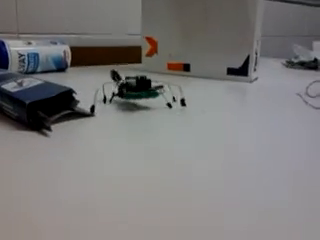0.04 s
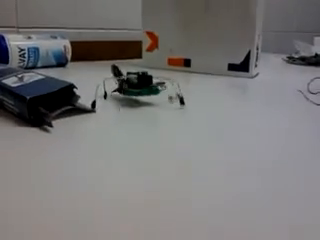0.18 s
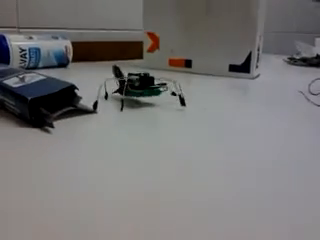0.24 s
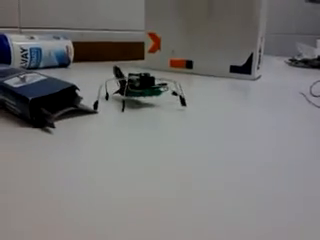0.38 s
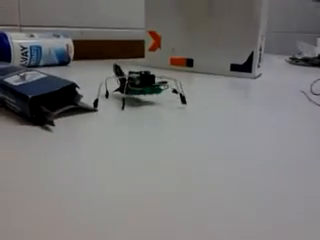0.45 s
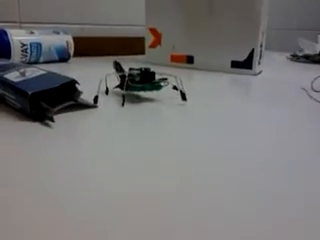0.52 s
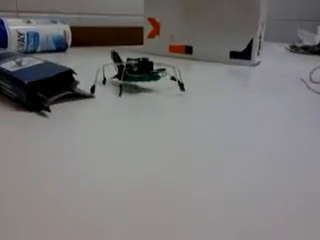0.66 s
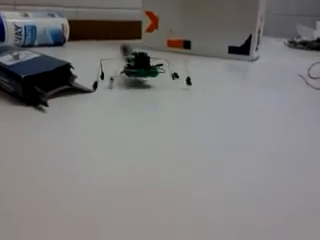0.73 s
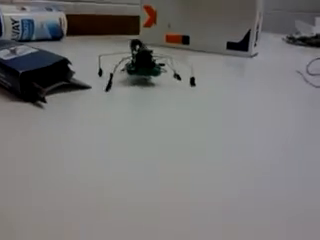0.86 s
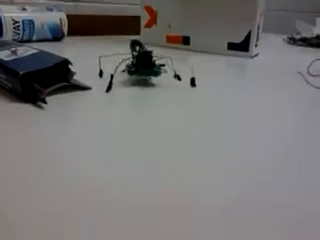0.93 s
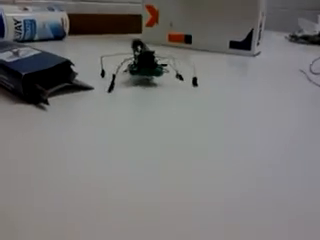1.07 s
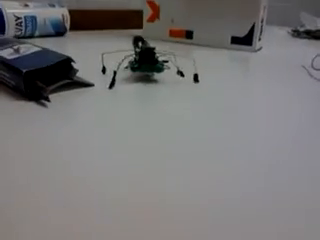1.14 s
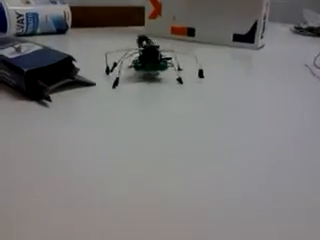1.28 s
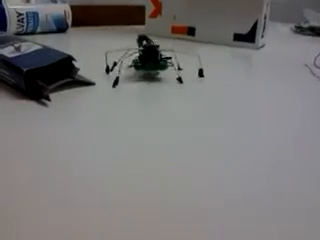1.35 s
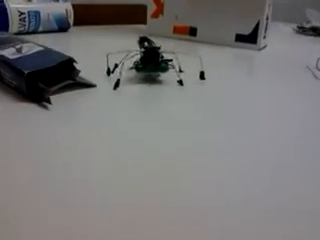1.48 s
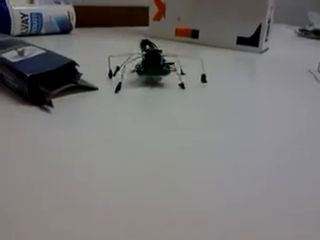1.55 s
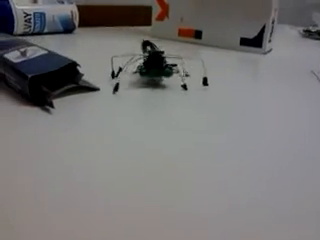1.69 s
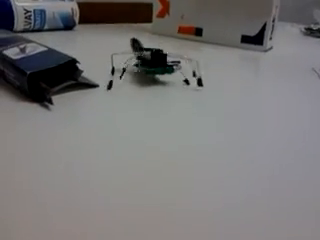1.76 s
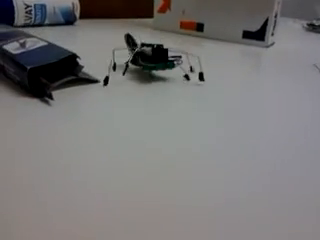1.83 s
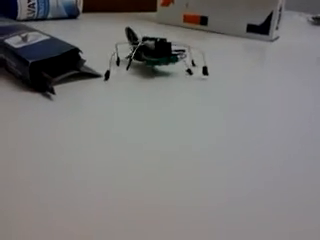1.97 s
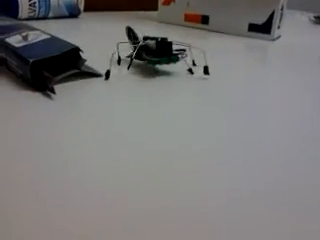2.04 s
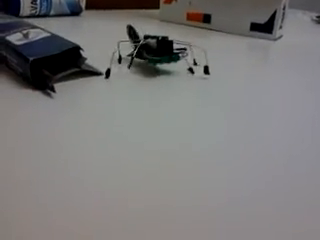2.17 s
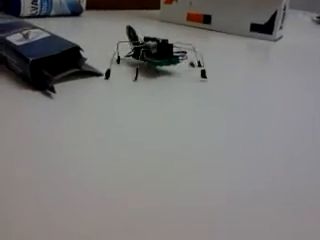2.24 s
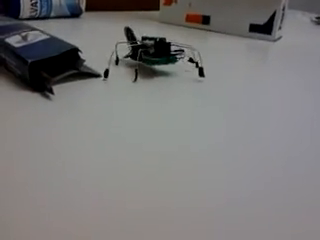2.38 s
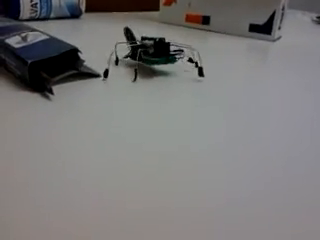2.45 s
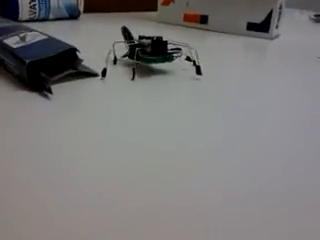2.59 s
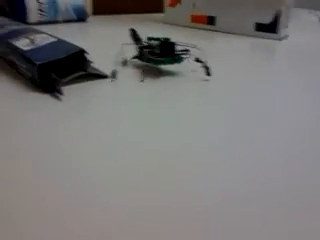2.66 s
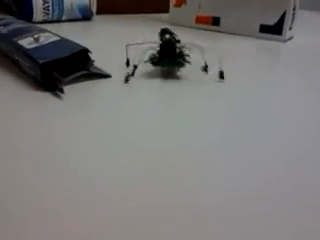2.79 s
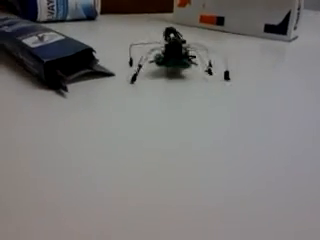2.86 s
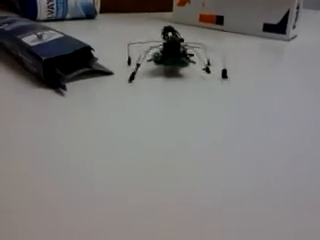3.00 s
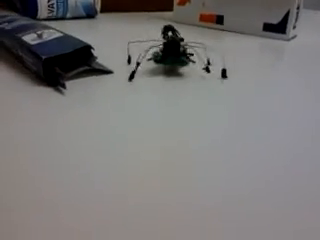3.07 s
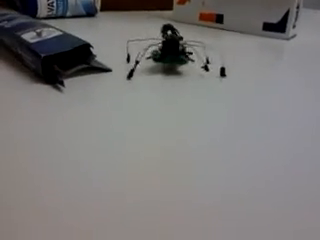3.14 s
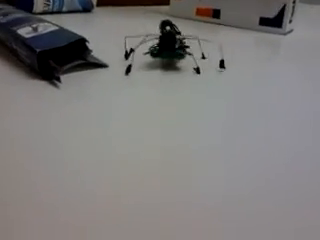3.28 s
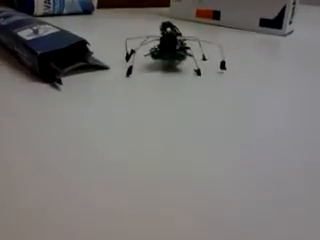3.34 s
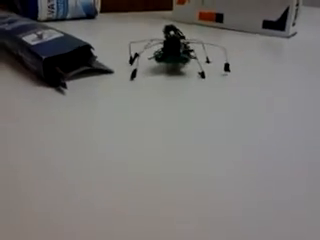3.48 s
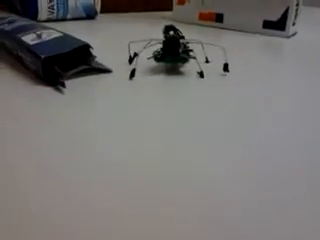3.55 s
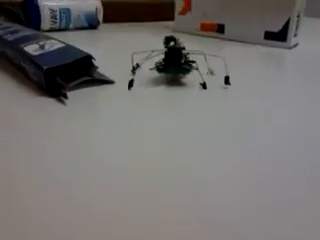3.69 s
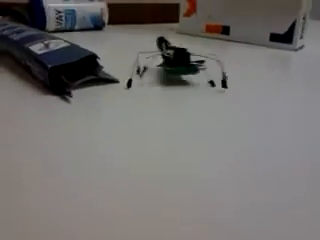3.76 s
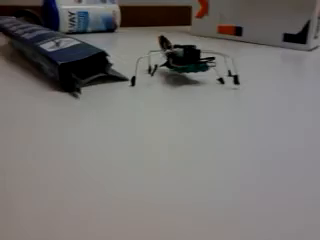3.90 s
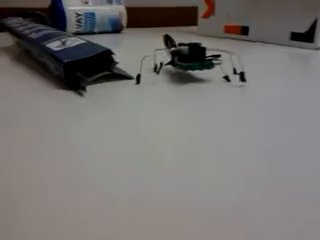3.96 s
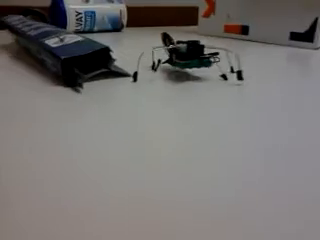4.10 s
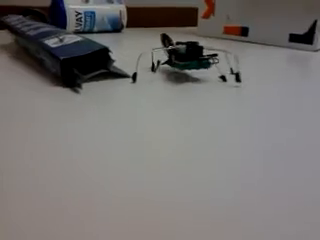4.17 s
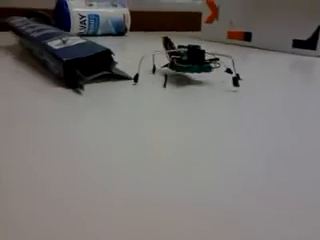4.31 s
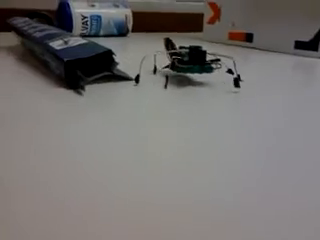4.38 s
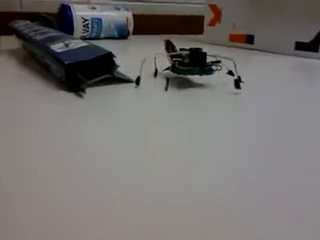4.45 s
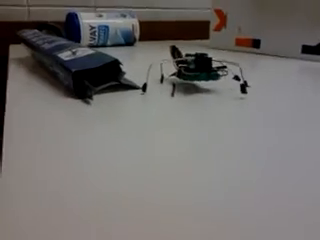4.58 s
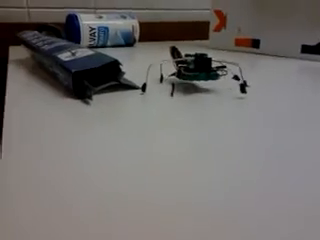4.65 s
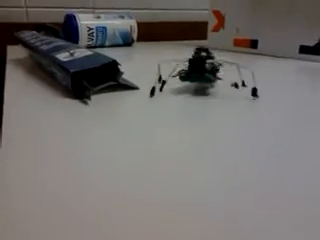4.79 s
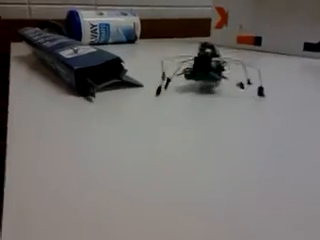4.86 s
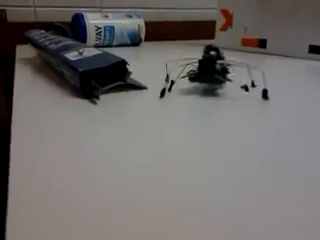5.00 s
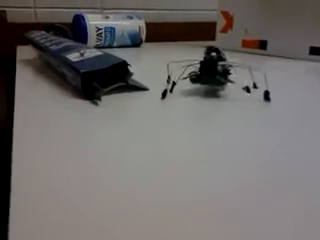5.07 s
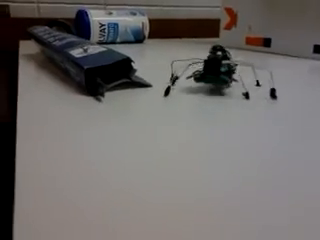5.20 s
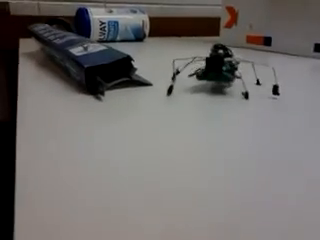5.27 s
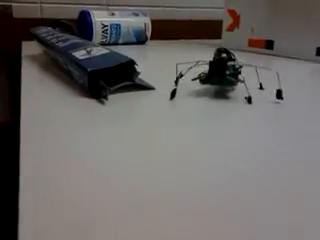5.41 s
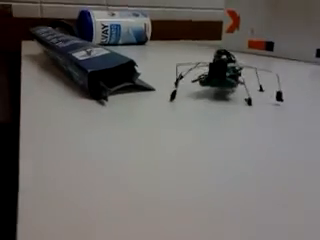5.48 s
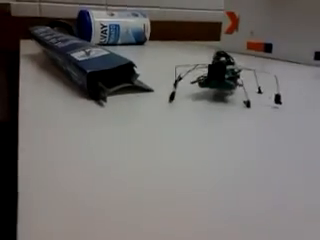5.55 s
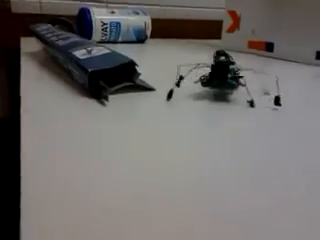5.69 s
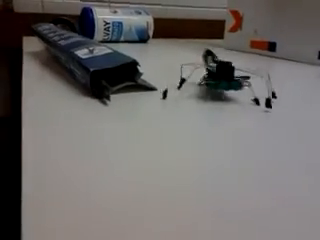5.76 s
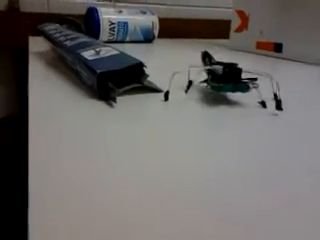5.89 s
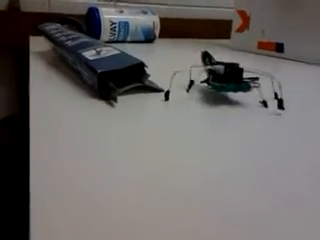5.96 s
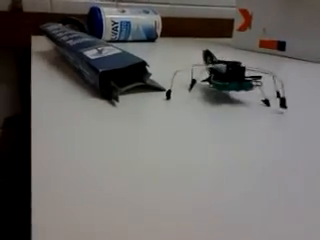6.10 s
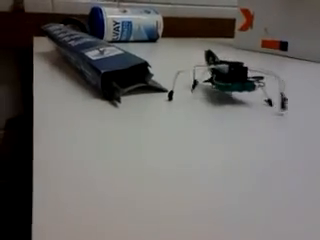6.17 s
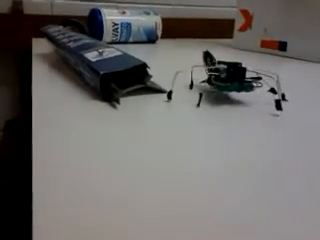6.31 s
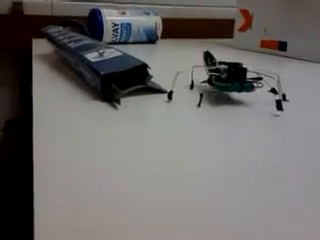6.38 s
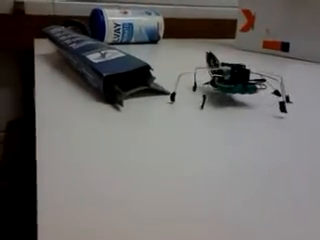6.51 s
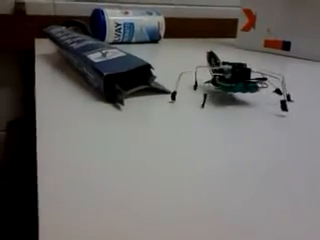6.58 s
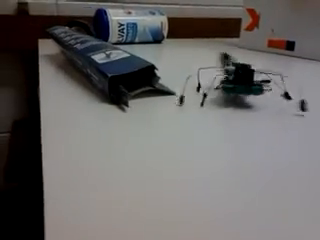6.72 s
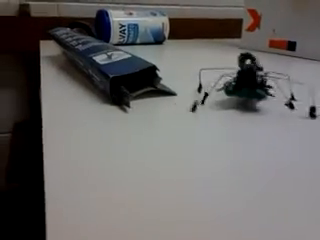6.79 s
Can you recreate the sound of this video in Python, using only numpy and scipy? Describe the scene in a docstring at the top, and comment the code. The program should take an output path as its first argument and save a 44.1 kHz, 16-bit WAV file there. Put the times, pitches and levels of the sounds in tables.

```python
"""A small wire-legged robot walks on a table in a quiet room. Its servos whirr on every beat, twice a second:
gear teeth tick and rub, a motor whines, and the motors fizz and grind while they hold each pose.
Feet land in pairs as short clusters of damped rings with a skid of noise; wire legs tick, a joint squeaks once.
Three dry clicks, each a snap, a knock and a rattle, sound right at the microphone.
A faint mains hum of wavering tones and a soft rush of noise lie under it all."""
import sys
import numpy as np
from scipy import signal
from scipy.fft import rfft, irfft
from scipy.io import wavfile
from scipy.ndimage import map_coordinates

SR = 44100
rng = np.random.default_rng(int(sys.argv[2]) if len(sys.argv) > 2 else 0)


def pcm_store(signal):
    """Save signal as 16-bit PCM."""
    levels = np.round(np.clip(np.atleast_2d(signal), -1, 1) * 32767)
    wavfile.write(sys.argv[1], SR, levels.astype(np.int16).T)


N = 301644

# the time of every sample (s); the walk is under way a moment before zero
TIME = np.arange(-SR // 4, N) / SR
# one servo stroke on every beat (s), and the control pulses that drive the servos (per second)
FIRST_STROKE_S, BEAT_S, PULSE_HZ = -.153, .5004, 49.7
# the four strokes of a stride (legs back, body over, legs forward, body back): [length_s, level_db,
# swell_db from start to end, gear_case_db, low_growl_db, motor_whine_db, spin_up_s, second_foot_db];
# case and growl are relative to the stroke, the whine stands alone, the second foot is relative to the first
GAIT = [(.118, -40.5, -2, -10, -19, -60, 0.016, -15), (.088, -42, -1, -6, -18, -68, .028, -6),
        (.104, -40.5, -9.5, -16, -17.5, -69, .014, 1.5), (.097, -43, -2, -9.5, -13, -62.5, .008, 1.5)]
# pairs of feet landing: [start_s, level_db, second_foot_after_s, pitch_ratio, brightness_db per octave]
FOOTFALLS = [(0.3814, -35.5, 0.0078, 0.98, 1.5), (0.9626, -44, 0.0085, 1.04, -5),
             (1.1549, -59, 0.0068, 1.06, -5.5), (1.3633, -47, 0.0016, 1.0, -1.5),
             (2.3948, -34.5, 0.0071, 0.99, 3), (2.9910, -44, 0.0056, 1.06, -5.5),
             (3.3734, -44, 0.0023, 0.99, 0), (3.872, -57.5, .0054, 0.85, 3),
             (4.3908, -35.3, 0.0048, 1.01, 1), (4.926, -55.5, 0.0048, 0.9, -10),
             (4.9935, -44, .0043, 1.09, -6.5), (5.3727, -44.5, 0.0024, 0.99, 0.5),
             (6.3855, -36.5, 0.0046, 1.06, -2)]


def undb(db):
    """Decibels to gain."""
    return 10 ** (np.asarray(db) / 20)


def unit(x):
    """Scale to rms 1."""
    return x / np.sqrt(np.mean(x ** 2))


def add(track, start, sound):
    """Mix a sound into a track at a time in seconds."""
    i = np.searchsorted(TIME, start)
    part = sound[:len(track) - i]
    track[i:i + len(part)] += part


def low_cut(x, hz):
    """Remove what lies below a pitch, with a second-order high-pass."""
    return signal.sosfilt(signal.butter(2, hz, 'highpass', fs=SR, output='sos'), x)


def colour(x, points):
    """Reshape the spectrum of a sound by a curve of (Hz, dB) points, at rms 1."""
    hz, db = np.transpose(points)
    f = np.maximum(np.fft.rfftfreq(len(x), 1 / SR), 1)
    gain = undb(np.interp(np.log(f), np.log(hz), db))
    return unit(irfft(rfft(x) * gain, len(x)))


def wander(rate):
    """Smooth random drift with a spread near 1, through a given number of random points a second."""
    knots = rng.standard_normal(4096)
    return map_coordinates(knots, [(TIME - TIME[0]) * rate], order=3, mode='wrap')


def envelope(t, length, attack_s, release_s):
    """Rise from t = 0, hold for a length, die away."""
    rise = 1 - np.exp(-np.maximum(t, 0) / attack_s)
    return rise * np.exp(-np.maximum(t - length, 0) / release_s)


def ring(modes, t, pitch=1, tilt_db=0):
    """Damped tones struck at t = 0; a wider mode dies faster, and tilt_db an octave tips the upper ones."""
    t = np.maximum(t, 0)
    out = np.zeros_like(t)
    for k, (hz, width, db) in enumerate(modes):
        sign = (-1) ** (k // 2)  # pairs of modes swing opposite ways
        gain = undb(db + tilt_db * np.log2(hz / modes[0][0]))
        out += sign * gain * np.exp(-np.pi * width * t) * np.sin(2 * np.pi * hz * pitch * t)
    return out


def strike(modes, t, pitch, tilt_db, chatter, chatter_s, count=6):
    """A springy wire hits the table and chatters a few times before it rests."""
    when, size = rng.uniform(-1, 1, (2, count))
    delays = (np.arange(count) + 1 + when / 2) * chatter_s
    sizes = size / np.linalg.norm(size)  # the bounces share a set part of the blow's energy
    bounces = sum(s * ring(modes, t - d, pitch, tilt_db) for d, s in zip(delays, sizes))
    return ring(modes, t, pitch, tilt_db) + chatter * bounces


def room(x, wet_db, build_s):
    """Add echoes as a tail of noise that builds up and fades; every half second draws a fresh tail."""
    t, step, out = np.arange(SR) / SR, SR // 2, x.copy()
    t60_s = .66  # time to fade by 60 dB
    for i in range(0, len(x), step):
        tail = rng.standard_normal(SR) * np.exp(-np.log(1000) * t / t60_s)
        tail *= 1 - np.exp(-(t / build_s) ** 2)
        echo = signal.fftconvolve(x[i:i + step], tail / np.linalg.norm(tail))
        add(out, TIME[i], undb(wet_db) * echo)
    return out


def beat_at(s):
    """Number of the gait's beat at a time in seconds."""
    return int((s - FIRST_STROKE_S) // BEAT_S)


def strokes():
    """Start time, gait row and load row of every stroke of the walk."""
    # the load on each beat: [extra_effort_db of the stroke, fizz_db and grind_db in the pose that follows]
    loads = [(3, -62.5, -66), (1.5, -55, -67), (2, -72, -65), (-2, -65, -65), (0, -65, -60.5),
             (1, -56, -73), (0.5, -65, -65), (-3.5, -64, -61.5), (0.5, -62.5, -65.5), (2, -58, -64),
             (0.5, -68.5, -70.5), (-3.5, -65.5, -68), (-2, -68, -64.5), (0, -60, -67)]
    return [(FIRST_STROKE_S + k * BEAT_S, GAIT[k % len(GAIT)], load) for k, load in enumerate(loads)]


def background():
    """Mains hum, a set of steady pitches that waver in level and phase, over the soft noisy rush of the room."""
    # mains hum: [pitch_hz, level_db (rms, before the waver)]
    hum_tones = [(49.4, -69.5), (148.2, -81.5), (197.4, -60.5), (246.8, -75.5), (296.1, -68.5),
                 (444.5, -73)]
    # spectrum of the room's rush: [pitch_hz, relative_level_db per Hz]
    air = [(20, 9.5), (33, 7.5), (48, -1), (70, -5.5), (110, -4), (150, -3), (280, -5), (450, -7.5),
           (800, -9), (1500, -16.5), (3000, -18.5), (7000, -35.5)]
    out = np.zeros_like(TIME)
    for hz, db in hum_tones:
        level = undb(db + wander(2.7)) * np.sqrt(2)  # a sine of rms 1 peaks at the root of 2
        out += level * np.sin(2 * np.pi * (hz * TIME + rng.random()) + 0.064 * wander(5.7))
    air_level = undb(-54.5 + .5 * wander(5.9))
    return out + air_level * colour(rng.standard_normal(len(TIME)), air)


def near_clicks():
    """A snap of a few cycles, a low knock and a brief rattle, too close to stir the room."""
    # dry clicks: [start_s, level_db, snap_hz at its middle, gliding down from 1.25 to 0.75 of it,
    # snap_length_s, knock_db, knock_hz, rattle_db]; knock and rattle are relative to the click's level
    clicks = [(2.7638, -21.5, 3300, .00035, 5.5, 1100, -15), (2.7909, -11.7, 3600, .0013, -3.5, 2200, -15),
              (5.0107, -8.8, 3950, .0008, -11, 2000, -21)]
    # spectrum of the rattle: [pitch_hz, relative_level_db per Hz]
    rattle_colour = [(60, -20), (300, -3), (1200, -3), (2500, -6), (5000, -11), (7000, -12), (8000, -52)]
    out, t = np.zeros_like(TIME), np.arange(SR // 25) / SR
    for start, db, hz, length, knock_db, knock_hz, rattle_db in clicks:
        progress = np.minimum(t / length, 1)
        snap = np.sin(np.pi * progress) ** 2 * np.sin(2 * np.pi * hz * t * (1.25 - .25 * progress))
        knock = low_cut(np.exp(-t / .0008) * np.sin(2 * np.pi * knock_hz * t), hz=300)
        rattle = np.exp(-t / .003) * colour(rng.standard_normal(len(t)), rattle_colour)
        add(out, start, undb(db) * (snap + undb(knock_db) * knock + undb(rattle_db) * rattle))
    return out


def squeak(flutter_db=2, waver_hz=42, sag_hz=35, sag_s=.018):
    """A dry joint sings in a run of ever weaker chirps; each sags in pitch, with a faint neighbour just above."""
    # chirps: [start_s, length_s before the release, level_db, pitch_hz that the sag settles to]
    chirps = [(1.426, 0.028, -38, 5130), (1.444, 0.034, -39, 5010), (1.494, 0.02, -40.5, 5010),
              (1.53, .028, -47, 5000), (1.588, 0.012, -49, 5020)]
    # tones of the joint: [pitch_ratio, relative_level_db]
    joint_tones = [(1, 0), (1.025, -11)]
    out, t = np.zeros_like(TIME), TIME - TIME[0]
    for start, length, db, hz in chirps:
        pitch = hz + sag_hz * np.exp(-t / sag_s) + waver_hz * wander(250)
        phase = 2 * np.pi * np.cumsum(pitch) / SR
        tones = sum(undb(tone_db) * np.sin(ratio * phase) for ratio, tone_db in joint_tones)
        add(out, start, undb(db) * tones * envelope(t, length, attack_s=.004, release_s=.02))
    return out * undb(flutter_db * wander(89.5))


def leg_ticks():
    """Wire legs snag and let go with a thin, scratchy tick: a short chattering ring."""
    # light ticks: [start_s, level_db, brightness_db per octave, average time between bounces_s]
    ticks = [(3.6357, -46, -4, 0.00055), (3.705, -57.5, 4, 0.00088), (3.7517, -48.5, 16, .0018),
             (4.087, -59, -10.5, 0.00094)]
    # tones of a leg: [pitch_hz before the pitch ratio below, width_hz, relative_level_db]
    leg_modes = [(1500, 2600, -3.5), (2650, 3600, 9), (3830, 2800, 26.5), (5500, 670, 14)]
    out, t = np.zeros_like(TIME), np.arange(SR // 25) / SR
    for start, db, tilt_db, chatter_s in ticks:
        tick = strike(leg_modes, t, .957, tilt_db, chatter=0.94, chatter_s=chatter_s)
        add(out, start, undb(db) * unit(tick))
    return out


def after_ring():
    """The lightly damped modes of table and room sound on after each footfall, a little differently each time."""
    # long rings: [pitch_hz, time to fade by 60 dB_s, relative_level_db]
    long_modes = [(410.4, 0.51, 5.5), (496, 0.47, 4), (1140, 0.4, -8.5)]
    out, t = np.zeros_like(TIME), np.arange(SR) / SR
    for start, db, *_ in FOOTFALLS:
        for hz, t60, mode_db in long_modes:
            size = undb(-20.5 + db + mode_db + 2 * rng.standard_normal())
            add(out, start, size * np.exp(-np.log(1000) * t / t60) * np.sin(2 * np.pi * hz * t))
    return out


def scuff(t, grit_db=4, fade_s=.013):
    """A foot skids over the table in a brief burst of uneven grains."""
    # grit under the foot: [pitch_hz, relative_level_db per Hz]
    grit_colour = [(300, -20.5), (700, -4), (1100, -2.5), (2000, -4.5), (3000, -4.5), (3900, -5.5),
                   (4800, -14.5), (7000, -16.5)]
    grains = rng.standard_normal(len(t)) * undb(grit_db * rng.standard_normal(len(t)))
    return unit(colour(grains, grit_colour) * np.exp(-t / fade_s))


def footsteps(chatter=0.95, chatter_s=0.0015, scuff_db=-5.5):
    """Two feet land milliseconds apart, tick, skid and ring frame and table; the beat sets which modes speak."""
    # frame and table top: [pitch_hz before the footfall's pitch ratio, width_hz, then relative level_db
    # as the body tips over, as the legs swing, as the body tips back]
    frame = [(420, 89, -14.5, -22.5, -5.5), (654, 130, -6, -16, -10), (805, 87, -6, -6, -6.5),
             (988, 130, -13.5, -5.5, -21.5), (1125, 100, 2.5, -4, 0), (1270, 270, -14.5, -12.5, -17),
             (1553, 230, -5, 3, -15.5), (1781, 110, 3, -2, 2), (2076, 130, 1, -2, -7.5),
             (2265, 230, -4.5, -8.5, 4.5), (2540, 240, 1.5, -4.5, -3.5), (3030, 220, -3.5, -14, -2),
             (3350, 280, -19, -15.5, -15), (3780, 260, -3.5, -21.5, -5.5)]
    # which of those three landings is heard in the beat of each stroke: [number from 0]
    landing = [1, 0, 1, 2]
    contact = (3600, 3300, 12)  # hard tick of wire on the table top: Hz, width Hz, dB
    out, t = np.zeros_like(TIME), np.arange(SR // 16) / SR
    for start, db, lag, pitch, tilt_db in FOOTFALLS:
        stroke = beat_at(start) % len(GAIT)
        modes = [(hz, width, levels[landing[stroke]]) for hz, width, *levels in frame] + [contact]
        first = strike(modes, t, pitch, tilt_db, chatter, chatter_s)
        second = strike(modes, t - lag, pitch, tilt_db, chatter, chatter_s)
        second_foot_db = GAIT[stroke][-1]
        knock = unit(low_cut(first + undb(second_foot_db) * second, hz=480))
        add(out, start, undb(db) * (knock + undb(scuff_db) * scuff(t)))
    return out


def teeth(tooth_hz, scatter_db, rub):
    """Gear teeth tick unevenly as they mesh, over the noisy rub of their flanks."""
    turns = np.cumsum(tooth_hz * (1 + .15 * wander(300))) / SR
    # one tick each time the count of teeth goes up by one
    ticks = np.diff(np.floor(turns), prepend=0) * undb(scatter_db * rng.standard_normal(len(TIME)))
    return unit(ticks - ticks.mean()) + rub * rng.standard_normal(len(TIME))


def strain(kick_db=7, kick_s=0.0029, settle_s=.019):
    """The motors fizz and grind in every pose, each by its own amount, kicked by each control pulse."""
    # spectra of the fizz and of the grinding: [pitch_hz, relative_level_db per Hz]
    fizz_colour = [(300, -69), (1500, -25), (3300, -13), (4500, 2), (5600, 15), (6200, 16.5), (6800, 15.5),
                   (7400, 5.5)]
    grind_colour = [(300, -13.5), (1000, -10.5), (1800, -2), (3000, -9.5), (4500, -3.5), (7000, -14)]
    fizz, grind = np.zeros((2, len(TIME)))
    for start, _, (_, fizz_db, grind_db) in strokes():
        # the load shifts smoothly from one pose to the next
        hold = envelope(np.arange(SR) / SR, BEAT_S, settle_s, settle_s / 2)
        add(fizz, start, undb(fizz_db) * hold)
        add(grind, start, undb(grind_db) * hold)
    since_pulse = TIME % (1 / PULSE_HZ)
    kicks = unit(1 + undb(kick_db) * np.exp(-since_pulse / kick_s))
    mesh = teeth(400, scatter_db=3, rub=1.2)
    held = fizz * colour(mesh, fizz_colour) + grind * colour(mesh, grind_colour)
    return kicks * held * undb(1.5 * wander(27))


def servos(brake_s=.024, motor_hz=1090, motor_waver=0.091):
    """Each stroke spins motor and gears up and brakes them; speed sets the pitch, speed and load the loudness."""
    # spectra of the tooth whirr, the ringing gear case and the low growl: [pitch_hz, relative_level_db per Hz]
    tooth_colour = [(300, -46), (1500, -47), (3000, -21), (4600, -7), (5150, -3), (5530, 3), (6100, 0),
                    (6700, 0), (7300, -1.5)]
    case_colour = [(500, -22.5), (2200, -15.5), (3100, -6), (3600, 2), (4200, -0.5), (4550, -5.5),
                   (5000, -1.5), (6000, -25), (7300, -17)]
    growl_colour = [(200, -7.5), (500, -3), (850, -14), (1100, -1), (1400, -14.5), (2100, -2), (3000, -9.5),
                    (6000, -22)]
    t = np.arange(SR // 2) / SR
    speed, whirr, case, growl, whine = np.zeros((5, len(TIME)))
    for start, gait_row, (effort_db, *_) in strokes():
        length, db, swell_db, case_db, growl_db, whine_db, spin_up_s, _ = gait_row
        run = envelope(t, length, spin_up_s, brake_s)
        swell = swell_db * (np.minimum(t / length, 1) - .5)
        effort = run * undb(db + effort_db + swell)
        add(speed, start, run)
        add(whirr, start, effort)
        add(case, start, effort * undb(case_db))
        add(growl, start, effort * undb(growl_db))
        add(whine, start, run * undb(whine_db))
    gears = np.zeros_like(TIME)
    for level, spectrum in ((whirr, tooth_colour), (case, case_colour), (growl, growl_colour)):
        # teeth per second: 330 at rest, 1430 at full speed
        mesh = teeth(1100 * (.3 + speed), scatter_db=3.5, rub=0.89)
        gears += level * colour(mesh, spectrum)
    pitch = motor_hz * (.9 + .1 * speed) * (1 + motor_waver * wander(200))
    return gears + whine * np.sin(2 * np.pi * np.cumsum(pitch) / SR)


def scene():
    """The robot, already on its way at time zero, in the room; the close clicks and the hum."""
    gears = room(servos() + strain() + leg_ticks(), wet_db=-2.0, build_s=0.001)
    joint = room(squeak(), wet_db=-12, build_s=.004)
    feet = room(footsteps(), wet_db=-3.9, build_s=0.004) + after_ring()
    return (gears + joint + feet + near_clicks() + background())[None, TIME >= 0]


def record(dry):
    """A small microphone with a narrow band: a gentle cut in the bass and a steep one in the treble."""
    top_hz = 7180
    treble_cut = signal.ellip(10, .2, 70, top_hz, fs=SR, output='sos')
    return signal.sosfilt(treble_cut, low_cut(dry, hz=38))


dry = scene()
out = record(dry)
pcm_store(out)
```